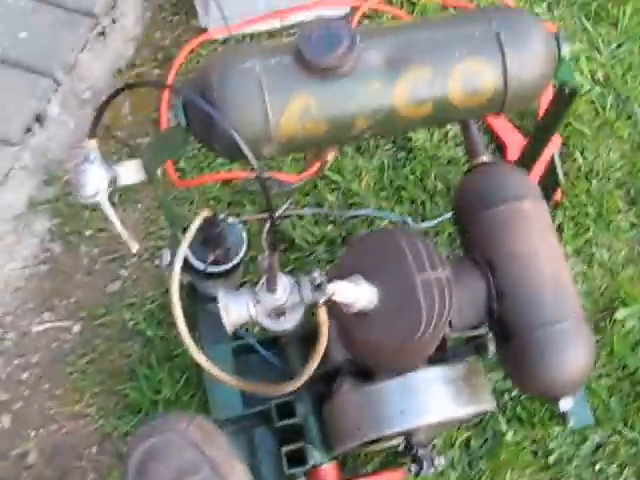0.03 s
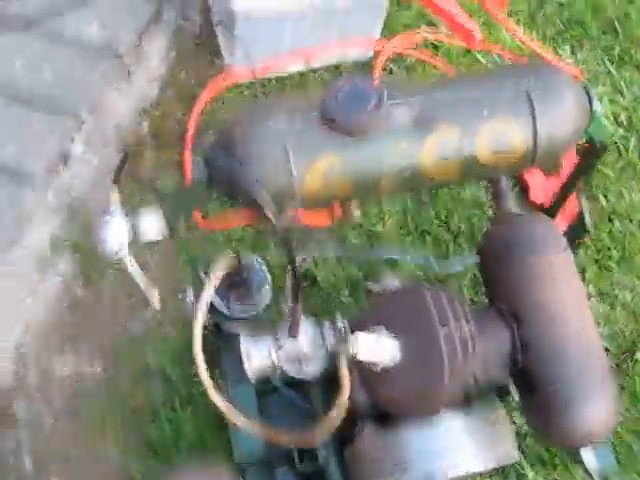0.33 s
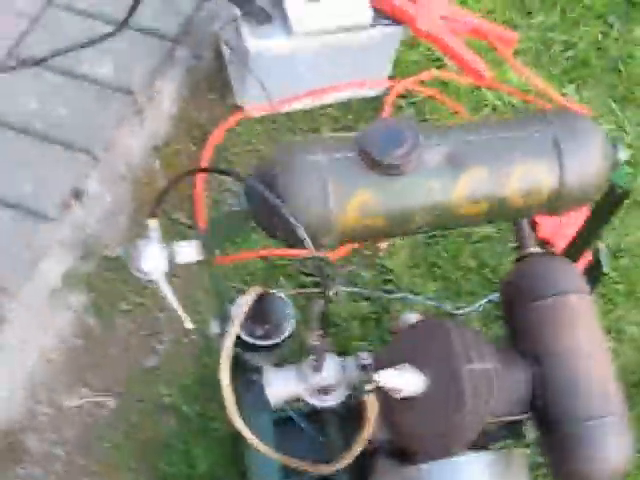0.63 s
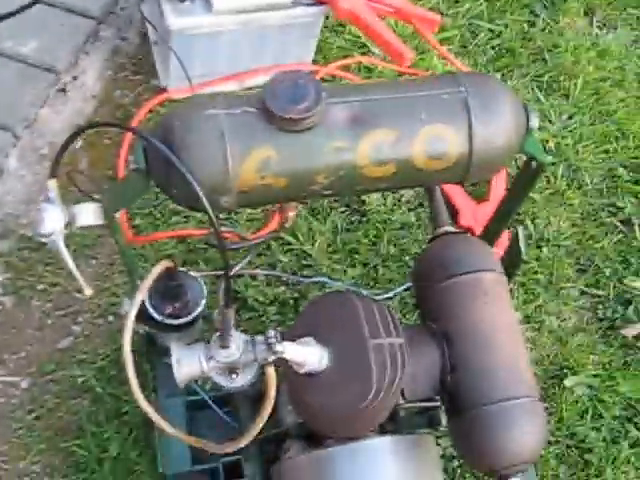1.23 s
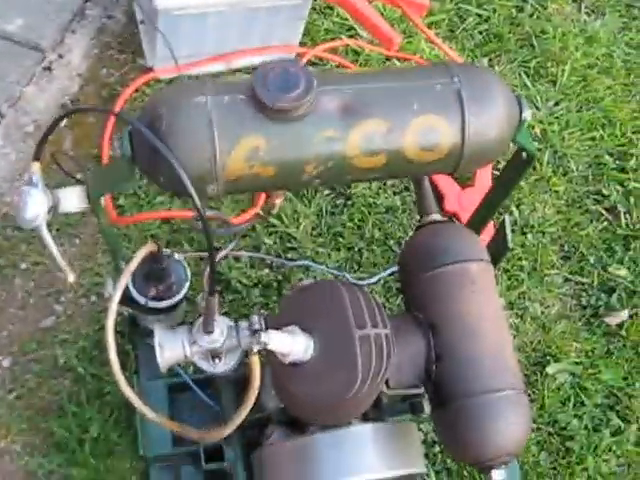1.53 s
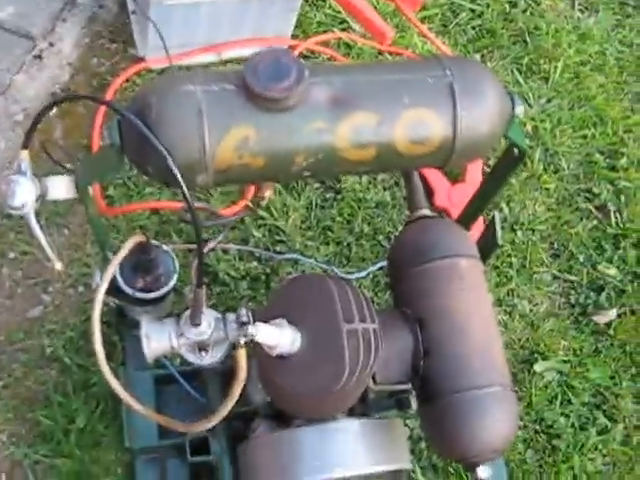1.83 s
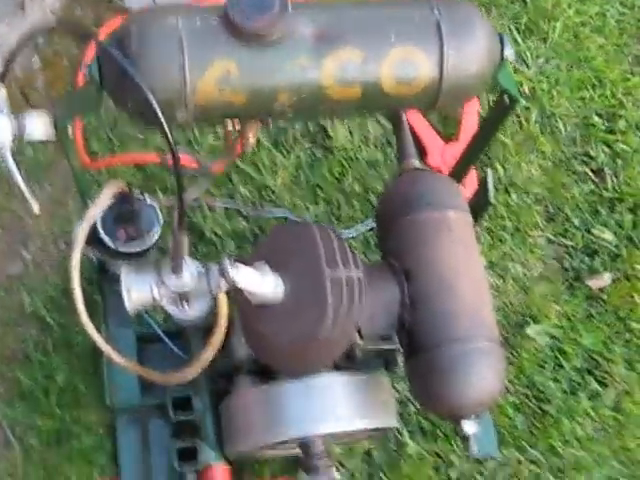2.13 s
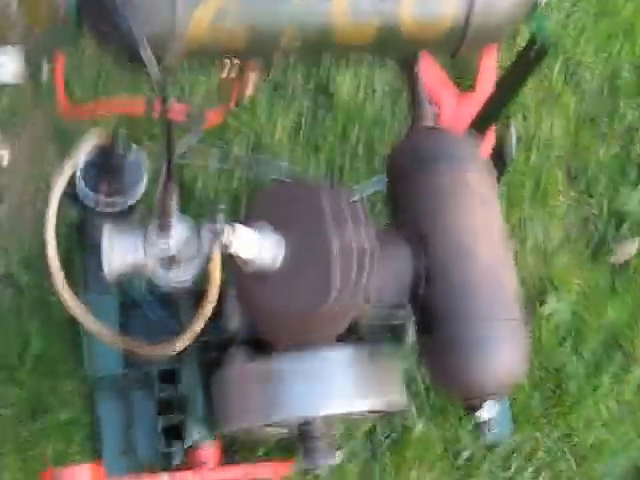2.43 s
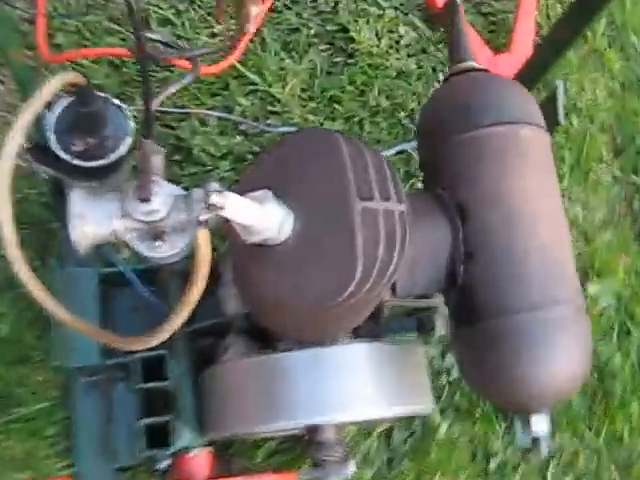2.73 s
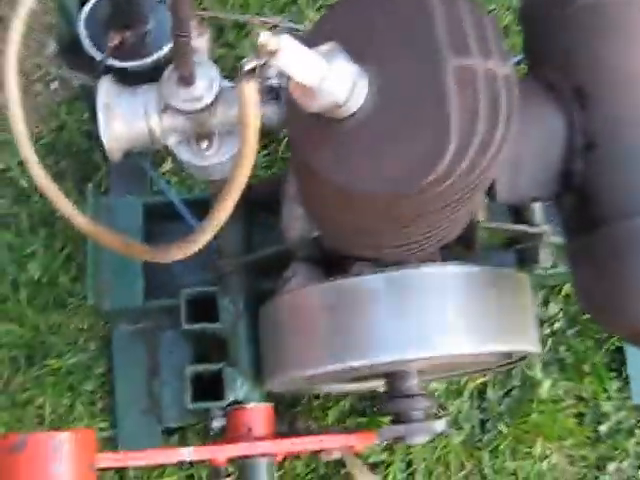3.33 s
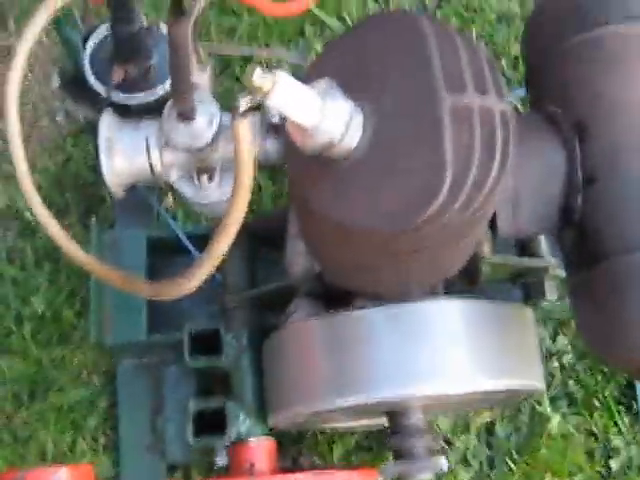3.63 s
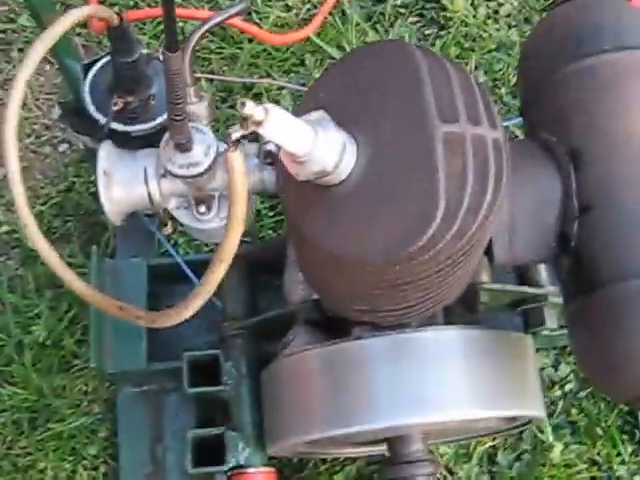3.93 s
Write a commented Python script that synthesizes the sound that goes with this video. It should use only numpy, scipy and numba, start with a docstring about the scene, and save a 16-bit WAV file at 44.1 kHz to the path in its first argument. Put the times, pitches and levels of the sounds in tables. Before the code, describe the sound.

Small single-cylinder engine starting with a lever clank and ratchet buzz, then putting unevenly.

```python
"""A kick lever clanks close by, steel on steel, as a small old single-cylinder petrol engine is started
on a lawn. The ratchet overruns with a buzz and drops out, and the engine idles unevenly over the clatter
of its moving parts. Each cycle is a rasp of air through the ports and an exhaust putt that rings the
silencer; many fire hard, with a sharp crack that rings the engine's metal."""
import sys
import numpy as np
from scipy import signal
from scipy.fft import rfft, irfft
from scipy.io import wavfile
from scipy.ndimage import uniform_filter1d
from numba import njit

SR = 44100
rng = np.random.default_rng(int(sys.argv[2]) if len(sys.argv) > 2 else 0)


def inscribe(sig):
    """Save sig as 16-bit PCM at rate SR to the path in sys.argv[1].

    A 1-D sig is mono; a 2-D sig holds one channel per row.
    Samples are clipped to [-1, 1] before scaling.
    """
    pcm = np.round(np.clip(np.atleast_2d(sig).T, -1, 1) * 32767)
    wavfile.write(sys.argv[1], SR, pcm.astype(np.int16))


N = 176400

# The idle, cycle by cycle. Each row: time of the exhaust putt in seconds, relative level of the
# silencer's ring in dB, relative level in dB of the rasp about half a cycle earlier.
PUTTS = [(1.218, -53, -32), (1.263, -31, -28), (1.309, -17.5, -20), (1.353, -51, -17), (1.403, -21, -25),
         (1.453, -17.5, -15.5), (1.499, -43, -14.5), (1.552, -18, -18), (1.598, -23, -13.5),
         (1.655, -18.5, -17), (1.705, -18.5, -15), (1.764, -17.5, -15.5), (1.814, -22.5, -13.5),
         (1.873, -15.5, -18.5), (1.928, -16, -15.5), (1.989, -26, -16), (2.048, -17.5, -20),
         (2.107, -47, -14.5), (2.174, -18.5, -20.5), (2.233, -31, -13.5), (2.298, -15, -19),
         (2.362, -48, -13), (2.426, -15.5, -23), (2.491, -36, -13), (2.56, -14, -16), (2.628, -30, -13.5),
         (2.694, -19, -23), (2.761, -19.5, -13), (2.831, -23.5, -13.5), (2.905, -13.5, -17.5),
         (2.975, -55, -13.5), (3.044, -16.5, -23.5), (3.111, -25.5, -12.5), (3.182, -28, -16),
         (3.257, -14, -17), (3.327, -53, -15.5), (3.394, -17.5, -25), (3.46, -13.5, -15),
         (3.527, -42.5, -14.5), (3.59, -19.5, -24), (3.655, -15, -14), (3.722, -35, -14.5),
         (3.789, -17, -20.5), (3.855, -25, -14.5), (3.922, -40, -15), (3.992, -15.5, -19)]
# The notes of the engine's metal. Each row: frequency in Hz, relative level in dB.
ENGINE_MODES = [(1990, 11), (2220, -20), (2490, 1), (3280, 10.5), (4340, 3.5), (4910, 4), (6070, -2),
                (6560, 15.5), (7790, 9)]
METAL_T60_S = 0.044
# The bright noise of ticks and cracks. Each row: frequency in Hz, relative level in dB.
CRACK_COLOUR = [(100, -25), (2000, -3), (4500, 0), (7000, 2), (13000, 0.5), (16000, -5.5)]


def amp(db):
    """Decibels to gain."""
    return 10 ** (np.asarray(db) / 20)


def unit(x):
    """Scale to rms 1."""
    return x / np.sqrt(np.mean(x ** 2))


def noise(colour):
    """Noise of rms 1 with a colour of (Hz, dB) points."""
    hz, db = np.array(colour).T
    bins_hz = np.maximum(np.arange(N // 2 + 1) * SR / N, 1)
    gain = amp(np.interp(np.log(bins_hz), np.log(hz), db))
    return unit(irfft(rfft(rng.standard_normal(N)) * gain, N))


def blows(times, db):
    """One impulse for each event."""
    out = np.zeros(N)
    at = np.round(np.asarray(times) * SR).astype(int)
    inside = (at >= 0) & (at < N)
    np.add.at(out, at[inside], amp(db)[inside])
    return out


def ringing(x, response):
    """Pass x through an impulse response."""
    return signal.fftconvolve(x, response)[:N]


def bursts(times, db, rise, decay, hold=0):
    """Envelope of events that rise, hold and die away, all in seconds; their powers add."""
    t = np.arange(N // 16) / SR
    shape = np.minimum(t / rise, 1) * np.exp(-np.maximum(t - rise - hold, 0) / decay)
    return np.sqrt(np.maximum(ringing(blows(times, db) ** 2, shape ** 2), 0))


@njit
def bandpass(x, hz, width_hz):
    """State-variable band-pass whose centre can move."""
    out, band_state, low_state = np.empty(len(x)), 0., 0.
    for i in range(len(x)):
        g, damping = np.tan(np.pi * hz[i] / SR), width_hz / hz[i]
        band = (band_state + g * (x[i] - low_state)) / (1 + g * (g + damping))
        band_state = 2 * band - band_state
        low_state += 2 * g * band
        out[i] = damping * band
    return out


def struck_metal(times, db, scatter_db):
    """The engine's metal rings; every blow shares its strength among the modes differently."""
    t = np.arange(N // 16) / SR
    fade = np.exp(-np.log(1000) * t / METAL_T60_S)
    scatter = scatter_db * rng.standard_normal((len(times), len(ENGINE_MODES))).T
    return sum(ringing(blows(times, db + mode_db + luck_db), np.sin(2 * np.pi * hz * t) * fade)
               for (hz, mode_db), luck_db in zip(ENGINE_MODES, scatter))


def silencer_tone():
    """The hollow note of the silencer: close resonances beating, held at nearly even strength."""
    # Each row: frequency in Hz, half the width of each filter in Hz, relative level in dB.
    resonances = [(899, 49.4, 3), (969, 61, 2), (1211, 76, -5.5)]
    tone = np.zeros(N)
    for hz, half_width, db in resonances:
        centre = np.full(N, float(hz))
        band = bandpass(rng.standard_normal(N), centre, 2. * half_width)
        tone += amp(db) * unit(bandpass(band, centre, 2. * half_width))
    return tone / np.sqrt(uniform_filter1d(tone ** 2, size=900))


def kick_lever():
    """Steel knocks on steel: a clank, a tick, the silencer's low ring and the engine's modes."""
    # The lever's blows and first ratchet teeth.
    # Each row: start in seconds, then the relative levels of clank, low ring and tick in dB.
    knocks = [(.009, -14, -27, -13), (0.0178, -22, -36, -23), (.023, -20, -15.5, -43),
              (0.2109, -22.5, -30.5, -23), (0.252, -36, -39, -53), (.346, -17.5, -21, -18),
              (0.3532, -10, -21, -10), (0.3656, -18.5, -23, -35), (.401, -13.5, -11, -37),
              (0.4174, -12, -27, -19), (0.4298, -13.5, -8, -24), (0.442, -20, -21, -18)]
    # Each row: frequency in Hz, relative level in dB.
    clank_colour = [(100, -13.5), (1000, 1.5), (2600, 9), (6300, -2), (7200, -9), (16000, -23)]
    at, clank_db, ring_db, tick_db = np.array(knocks).T
    hit = bursts(at, clank_db, rise=0.0005, hold=0.001, decay=0.0046)
    tail = bursts(at, clank_db - 11.5, rise=0.0013, decay=0.022)
    clank = noise(clank_colour) * (hit + tail)
    tick = noise(CRACK_COLOUR) * bursts(at, tick_db + 5.5, rise=0.00025, decay=0.0021)
    ring = silencer_tone() * bursts(at, ring_db, rise=0.00092, decay=0.015)
    return clank + tick + ring + struck_metal(at, clank_db - 23, scatter_db=5)


def garden():
    """The faint, even hush of the open air."""
    # Each row: frequency in Hz, relative level in dB.
    hush_colour = [(60, -9), (400, -7), (1400, 1), (2600, -7.5), (15000, -20)]
    return amp(-41.5) * noise(hush_colour)


def running_gear():
    """The moving parts make a steady wash of clatter that swells as the engine catches."""
    # Each row: time in seconds, level in dB.
    clatter_levels = [(.32, -52), (.45, -43), (1.18, -42), (1.3, -28), (1.7, -30.5), (2.3, -32)]
    # Each row: frequency in Hz, relative level in dB.
    clatter_colour = [(30, -32), (130, 13), (270, 6.5), (380, -18), (930, 13), (1500, -2.5), (2200, 12),
                      (6600, -2.5), (16000, -19.5)]
    times, db = np.array(clatter_levels).T
    return noise(clatter_colour) * amp(np.interp(np.arange(N) / SR, times, db))


def ratchet():
    """The pawl buzzes over the teeth as long as the lever is held down."""
    # Each row: time in seconds, speed in teeth per second.
    overrun = [(0.447, 67.8), (0.474, 81), (0.549, 121), (.6, 129), (.86, 138), (1.195, 139)]
    # One tooth's click. Each row: frequency in Hz, relative level in dB.
    tooth_colour = [(620, -52), (930, -0.5), (1300, -17), (2900, 3), (3800, -5.5), (5000, 2.5),
                    (7200, -3.5), (8300, -1.5), (8930, 7), (9600, -4), (12000, -8), (12950, -2),
                    (14300, -8), (15400, -7)]
    times, rate = np.array(overrun).T
    t = np.arange(int(times[0] * SR), int(times[-1] * SR)) / SR
    teeth_passed = np.floor(np.cumsum(np.interp(t, times, rate)) / SR + 0.638)
    at = t[1:][np.diff(teeth_passed) > 0]
    late, strong = rng.standard_normal((N // 1000, 2))[:len(at)].T  # no two teeth click alike
    clicks = bursts(at + 0.00022 * late, -16.5 + 2.25 * strong, rise=0.0023, decay=0.0043)
    return noise(tooth_colour) * clicks


def spin_up():
    """Soft uneven putts as the kicked engine gathers speed."""
    start_s, first_gap_s, shorten_s, lead_s = 0.518, 0.0505, 0.00062, 0.003
    cycle = np.arange(14)
    at = start_s + first_gap_s * cycle - shorten_s * cycle * (cycle - 1) / 2
    db = -39 + 5.6 * rng.standard_normal(len(at))
    t = np.arange(N // 64) / SR
    putt = np.sin(2 * np.pi * 170 * t) * np.exp(-((t - lead_s) / 0.0029) ** 2)
    return ringing(blows(at - lead_s, db), putt)


def piston_whistle(putt_at, rasp_at, db):
    """A breathy air resonance swells around each rasp, its pitch rising and falling with the piston."""
    low_hz, high_hz, peak_phase = 970, 2830, 0.641
    cycles = np.interp(np.arange(N) / SR, putt_at, np.arange(len(putt_at)))
    piston = (0.5 + 0.5 * np.cos(2 * np.pi * (cycles - peak_phase))) ** 2
    whistle = unit(bandpass(rng.standard_normal(N), low_hz + (high_hz - low_hz) * piston, width_hz=530.))
    return whistle * bursts(rasp_at - 0.012, db - 8.5, rise=0.01, hold=0.0087, decay=0.021)


def air_rasps():
    """Gritty air rasps through the ports in mid-cycle, opening with a clack, and chuffs with the putt."""
    # Each row: frequency in Hz, relative level in dB.
    air_colour = [(130, -9), (400, -12.5), (1100, -2.5), (1550, -6), (2600, 2), (3900, -3.5), (4600, -2),
                  (9500, -12.5), (16000, -22.5)]
    at, ring_db, rasp_db = np.array(PUTTS).T
    starts = np.append(2 * at[0] - at[1], at[:-1])
    rasp_at = starts + 0.575 * (at - starts)
    rasp = bursts(rasp_at, rasp_db - 1.5, rise=0.0023, hold=0.0052, decay=0.0091)
    chuff = bursts(at - 0.002, (rasp_db + ring_db) / 2 - 5.5, rise=0.0023, hold=0.012, decay=0.0079)
    clack = bursts(rasp_at, rasp_db + 2 + 2 * rng.standard_normal(len(at)), rise=0.00045, decay=0.0025)
    grit_db = 1.9 * unit(uniform_filter1d(rng.standard_normal(N), size=50))
    whistle = piston_whistle(at, rasp_at, rasp_db)
    air = noise(air_colour) * unit(amp(grit_db))
    return air * np.sqrt(rasp ** 2 + chuff ** 2 + clack ** 2) + whistle


def thumps(times, db):
    """A short pressure pulse leaves the pipe and swings back below zero."""
    width_s, low_cut_hz = 0.00093, 89
    t = np.arange(N // 64) / SR
    lead_s = 4 * width_s
    pulse = np.exp(-0.5 * ((t - lead_s) / width_s) ** 2)
    thump = signal.sosfilt(signal.butter(2, low_cut_hz, "high", fs=SR, output="sos"), pulse)
    return ringing(blows(times - lead_s, db), thump)


def exhaust():
    """Every putt is a thump and a puff of gas that rings the silencer."""
    at, ring_db, rasp_db = np.array(PUTTS).T
    putt_db = -20.5 + 0.6 * rasp_db + rng.standard_normal(len(at))  # grows with the rasp before it
    gas = noise([(40, -26), (140, -16), (280, -17), (380, -24.5), (700, -6.5), (8000, -46)])
    puff = gas * bursts(at - 0.005, putt_db, rise=0.0018, decay=0.0092)
    ring = silencer_tone() * bursts(at - 0.002, ring_db - 3.5, rise=0.0018, hold=0.014, decay=0.014)
    lead_in = silencer_tone() * bursts(at - 0.017, rasp_db - 3.5, rise=0.0042, decay=0.005)
    return thumps(at, putt_db + 10.5) + puff + ring + lead_in


def hard_firings():
    """A hard firing gives a bright crack; the cylinder and flywheel ring on."""
    # Each row: start in seconds, relative level in dB.
    firings = [(1.2158, -23.5), (1.3546, -16), (1.499, -17.5), (1.6003, -23.5), (1.706, -25),
               (1.814, -17.5), (1.987, -16.5), (2.106, -19.5), (2.231, -16.5), (2.3605, -18), (2.49, -17.5),
               (2.626, -16.5), (2.7598, -20.5), (2.8306, -17.5), (2.9731, -15), (3.1098, -21.5),
               (3.181, -16), (3.327, -13.5), (3.5248, -12.5), (3.7215, -14.5), (3.854, -19.5),
               (3.9214, -15)]
    at, db = np.array(firings).T
    crack = noise(CRACK_COLOUR) * bursts(at, db + 8, rise=0.0013, decay=0.0045)
    return crack + struck_metal(at, db - 28.5, scatter_db=4)


def engine_body(x):
    """The engine's metal adds a short ring to the sounds made inside it."""
    t = np.arange(N // 16) / SR
    fade = np.exp(-np.log(1000) * t / METAL_T60_S)
    modes = fade * sum(amp(db) * np.cos(2 * np.pi * hz * t) for hz, db in ENGINE_MODES)
    return x + ringing(x, amp(-14.5) * modes / np.linalg.norm(modes))


def scene():
    """The kick-start and the idle in a quiet garden, in mono."""
    start = kick_lever() + ratchet() + spin_up()
    idle = engine_body(air_rasps() + hard_firings() + running_gear()) + exhaust()
    return (start + idle + garden())[None]


def record(dry):
    """Round off the loudest peaks and cut the top above 15.9 kHz."""
    top_cut = signal.ellip(10, 0.2, 70, 15900, fs=SR, output="sos")
    return signal.sosfilt(top_cut, np.tanh(dry))


dry = scene()
out = record(dry)
inscribe(out)
```